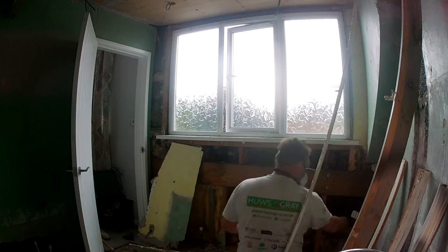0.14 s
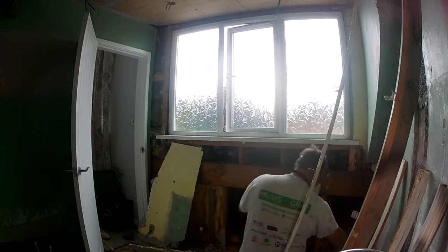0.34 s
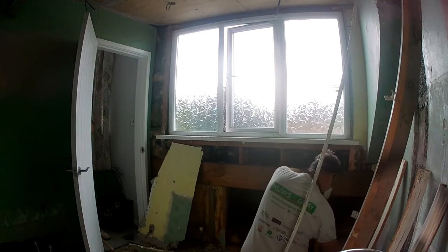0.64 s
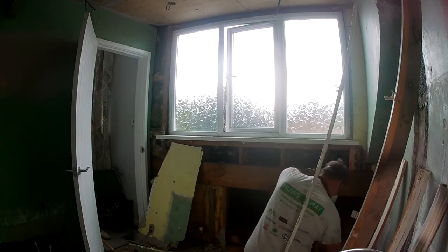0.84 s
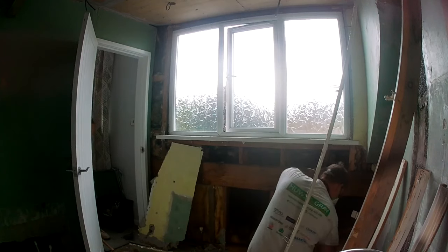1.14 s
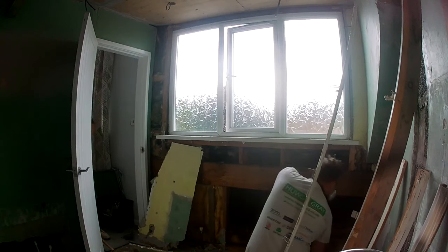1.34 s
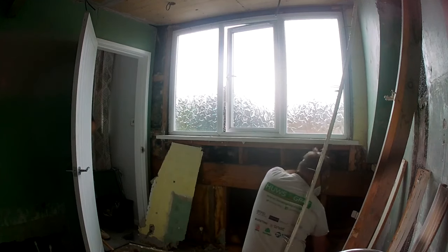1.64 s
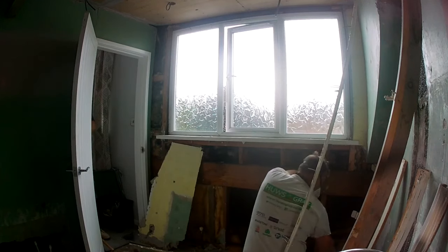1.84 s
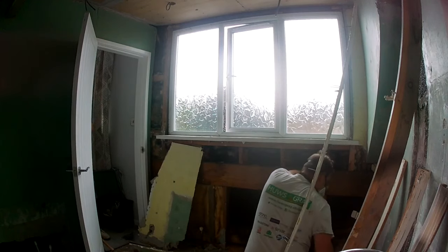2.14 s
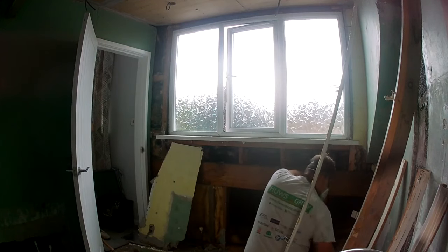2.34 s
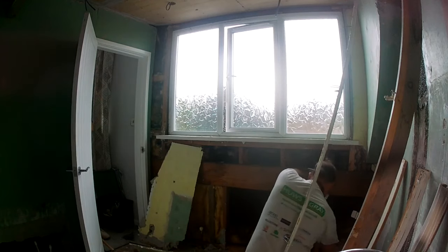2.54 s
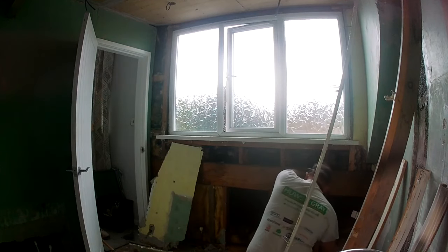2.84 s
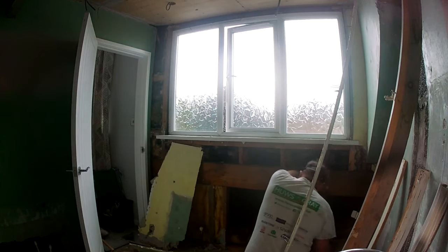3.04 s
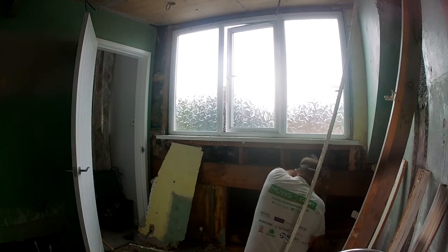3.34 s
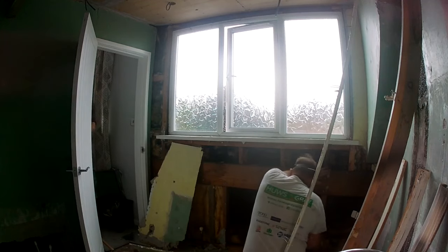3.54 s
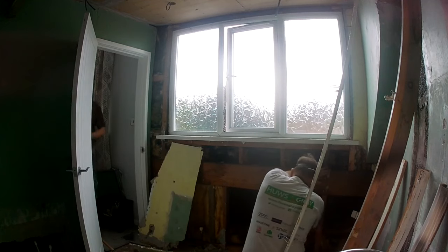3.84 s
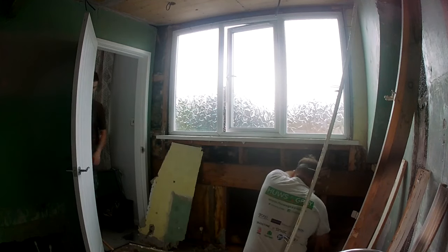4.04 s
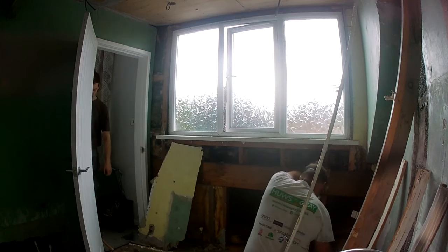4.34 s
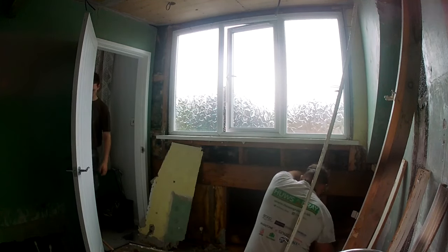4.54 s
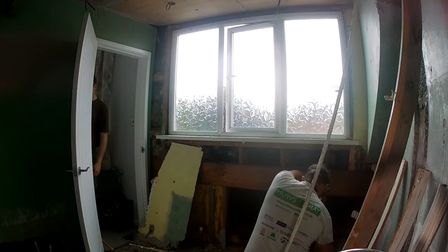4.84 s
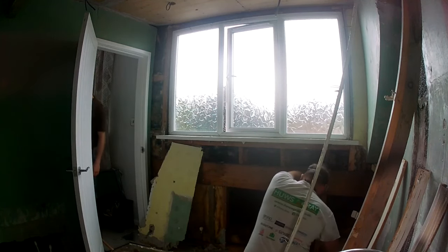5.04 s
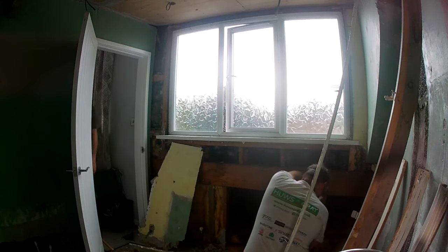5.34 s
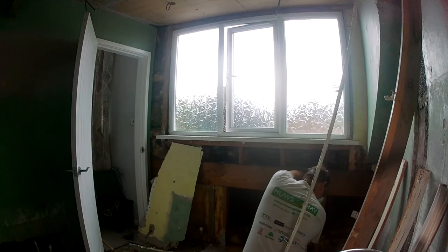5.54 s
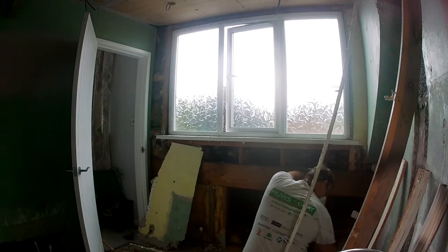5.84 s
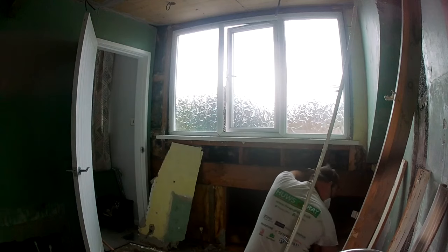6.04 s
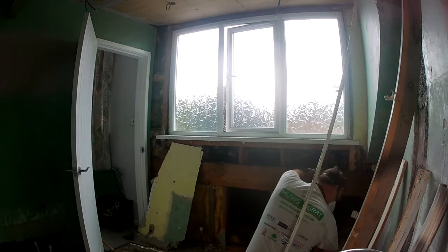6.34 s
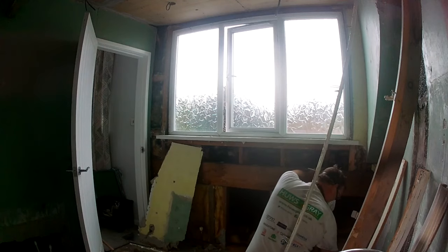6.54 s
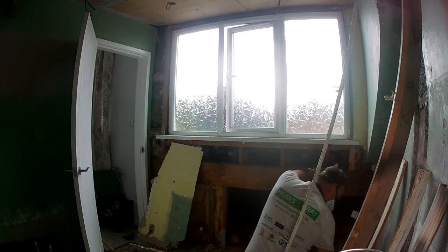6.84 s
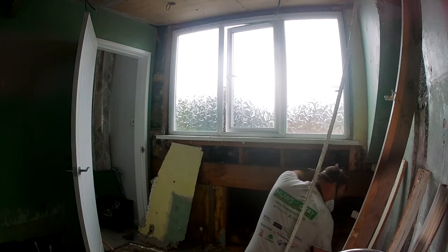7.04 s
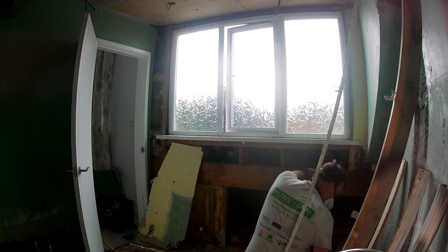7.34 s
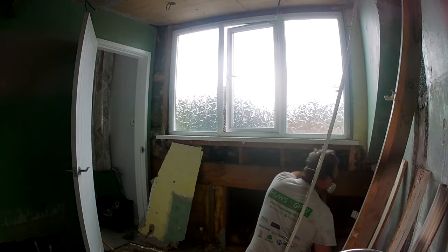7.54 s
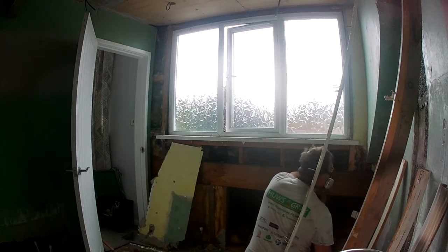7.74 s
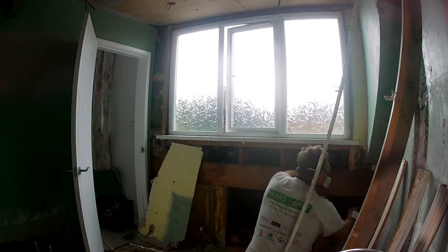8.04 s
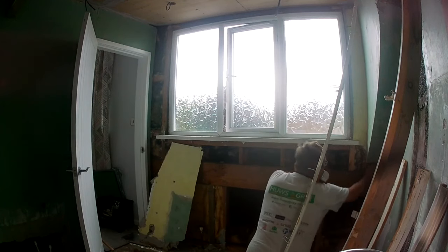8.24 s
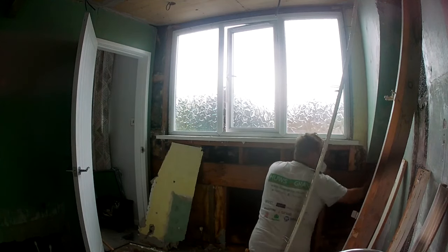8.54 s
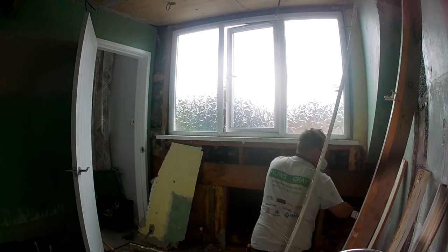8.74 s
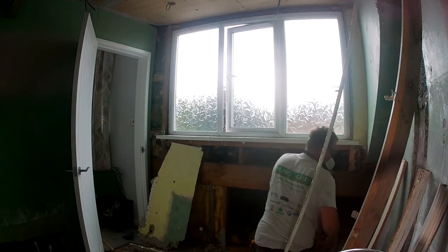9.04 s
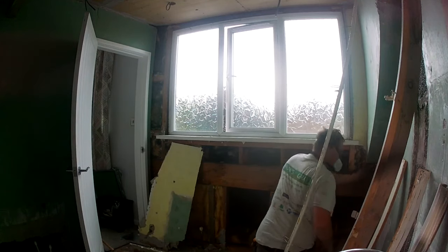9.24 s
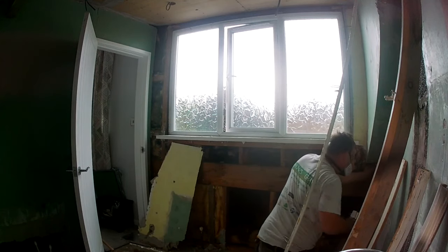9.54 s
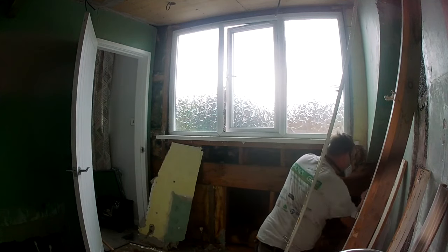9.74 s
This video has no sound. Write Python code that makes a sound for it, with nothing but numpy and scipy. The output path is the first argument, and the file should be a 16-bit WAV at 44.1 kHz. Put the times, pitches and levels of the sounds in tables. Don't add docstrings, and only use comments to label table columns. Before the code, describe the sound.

In a bare room being renovated, old boards are pried from a wall and handled, heard by a small microphone across the room. At 0-0.3 s a strong drag and hollow clattering knocks with low thumps, then light taps fading by 0.6 s. A weak tap at 1.0 and bumps at 1.25-1.5 lead to a heavy thud at 1.7 with rattling rebounds until 1.9. Quiet scuffs, moderate bumps at 2.6 and 3.2. At 3.5-3.8 a loud scrape and rapid cluster of deep blows. Lull, then knocks and short pulls at 4.3-5.0. The loudest double crash, woody and splintering, hits at 5.7. Faint shuffling follows, with a scrape and small knocks at 7.05-7.3. Sparse soft bumps until 8.6, then sharp cracks, a scrape and clatter at 8.9-9.2, lighter knocks at 9.4-9.7. Short hard reverberation, muffled treble, faint constant rumble.

```python
import sys
import numpy as np
from scipy import signal
from scipy.fft import rfft, irfft
from scipy.io import wavfile
from scipy.ndimage import uniform_filter1d

SR = 44100
rng = np.random.default_rng(int(sys.argv[2]) if len(sys.argv) > 2 else 0)


def ratio_of_db(decibels):
    return 10 ** (np.asarray(decibels, float) / 20)


def waveform_to_disk(signal):
    frames = np.transpose(np.atleast_2d(signal))
    scaled = np.clip(frames, -1, 1) * 32767
    samples = np.round(scaled).astype(np.int16)
    wavfile.write(sys.argv[1], SR, samples)


N = 436590

# (frequency [Hz], level [dB], decay time T60 [s])
FLOOR_MODES = [(59.3, -11, 0.1), (79.2, 6, 0.47), (97, -9, 0.86), (108, -17.5, 0.16)]
FRAMING_MODES = [(159.1, 4, 0.39), (188, -4, 0.35), (228, -3.5, 0.14), (281.4, 5, 0.2), (317.4, 2.5, 0.21)]
BOARD_MODES = [(388, -3.5, 0.048), (458, 0, 0.039), (590, 13.5, 0.03), (705.5, 2.5, 0.12), (831, 12, 0.045),
               (960, 13, 0.031), (1091, 12, 0.034), (1281, 15.5, 0.02), (1514, 14.5, 0.028),
               (1800, -21, 0.016)]
# (frequency [Hz], decay time T60 [s])
ROOM_T60 = [(60, 0.092), (250, 0.32), (1000, 0.37), (4000, 0.31), (12000, 0.29)]
# (frequency [Hz], density [dB per Hz])
HUM_SPECTRUM = [(12, -47), (20, 15.5), (58, -5.5), (416, -16.5), (581, -11.5), (811, -15.5), (1540, -32),
                (1980, -29.5), (3170, -37.5), (3750, -42), (6540, -45), (15500, -57)]
# (frequency [Hz], limit over the local band [dB])
THINNING = [(2000, -14), (3000, -7), (4300, -3), (4700, 2), (6800, 3.5), (16000, 4.5)]

# (time [s], held [s], board level [dB], framing rel. to board [dB])
FLOOR_DRAGS = [
    (0.0, 0.18, -42, 1),
    (1.3, 0.26, -69.5, 12),
    (1.78, 0.091, -49, 5.5),
    (3.76, 0.045, -54.5, 13),
    (4.47, 0.15, -50, 3),
    (4.84, 0.18, -69.5, 18.5),
    (5.0, 0.02, -50, -3),
    (5.82, 0.082, -49.5, 8),
    (5.98, 0.05, -51.5, -19),
    (8.52, 0.097, -62, 0),
]
# (time [s], held [s], board level [dB], framing rel. to board [dB])
WALL_DRAGS = [(0.27, 0.11, -49.5, -42), (.45, .08, -69, -6), (2.08, 0.15, -61, -19),
              (2.72, 0.16, -57.5, -5), (3.15, 0.24, -72, -6.5), (3.56, 0.16, -40, 2.5),
              (4.31, 0.084, -55, -24), (5.19, 0.23, -65, -24.5), (6.15, 0.4, -67, -40),
              (6.58, 0.043, -59, -14), (6.88, 0.071, -71.5, -16), (7.11, 0.17, -44, -2.5),
              (7.78, 0.014, -78, 2), (7.96, 0.018, -73.5, 1), (8.36, 0.14, -68.5, -1),
              (8.9, 0.065, -52, -6.5), (9.05, 0.11, -39, -25), (9.25, 0.16, -58.5, -4),
              (9.46, 0.039, -50.5, -36)]
# (time [s], board level [dB])
SHUFFLE = [(0, -64.5), (.8, -68.5), (1.5, -63), (2.4, -80), (3.1, -68), (4.1, -78.5), (5.5, -65.5),
           (6.8, -65), (7.8, -72.5), (8.7, -65.5), (9.65, -69), (9.9, -97.5)]

# (time [s], framing level [dB], framing pitch [Hz], floor level [dB])
DEEP_THUDS = [(0.012, -30.5, 288, -32), (0.086, -22.5, 217, -24), (1.698, -13.5, 180, -27),
              (1.908, -36, 237, -55), (2.779, -40, 314, -55), (3.172, -44, 312, -59),
              (3.378, -71, 139, -47), (3.544, -13, 180, -16), (3.639, -13.5, 156, -42),
              (3.664, -16.5, 305.4, -21), (3.721, -14.5, 166, -31), (3.838, -24, 163, -30),
              (4.059, -65, 137, -43), (4.11, -67, 140, -48), (4.529, -31.5, 228, -30),
              (4.599, -29, 249, -33), (4.901, -55, 209, -44), (4.99, -21, 289.4, -32.5),
              (5.668, -19.5, 156, -22.5), (5.699, -9, 261, -19), (5.747, -13, 169, -30),
              (5.987, -27, 157, -33.5), (6.443, -43.5, 176, -40), (8.348, -48.5, 332, -58),
              (8.539, -59, 150, -44.5), (9.473, -50, 356, -66)]
# (time [s], framing level [dB], framing pitch [Hz], floor level [dB])
TIGHT_THUDS = [(0.245, -31.5, 167, -48), (1.243, -41, 310, -41), (1.336, -43, 356, -50),
               (1.487, -34.5, 161, -46.5), (1.551, -36, 168, -52), (1.645, -23.5, 173, -30),
               (1.681, -10.5, 208, -17.5), (1.849, -24.5, 160, -39), (2.612, -31, 173.4, -31.5),
               (2.65, -28, 142, -34.5), (3.529, -15.5, 267, -23), (3.585, -14, 163, -38),
               (4.462, -36.5, 330, -37), (4.855, -34, 248, -51), (4.97, -31, 186, -55),
               (5.017, -31.5, 380, -29.5), (7.048, -37, 197, -61), (7.203, -24.5, 173, -68),
               (7.283, -27, 180, -62), (8.884, -39, 185.2, -62), (9.048, -34, 236, -61),
               (9.109, -37, 373, -38)]

# (time [s], peak [dB], board pitch [Hz], crack rel. [dB])
FIRM_KNOCKS = [(0.015, -26.5, 618, -21.5), (0.087, -19, 1036, -34), (0.102, -22.5, 817, -23),
               (0.149, -30.5, 967, -17), (0.999, -53.5, 816, -13), (1.249, -40, 435, -35),
               (1.379, -46, 760, -17.5), (1.685, -23, 367, -20), (1.699, -26, 620, -24),
               (2.611, -42.5, 580, -32), (3.173, -43, 597, -14.5), (3.64, -22, 543, -17),
               (4.992, -28.5, 455, -22.5), (5.749, -17, 950, -19.5), (5.951, -39.5, 410, -10),
               (6.588, -54.5, 700, -14), (7.065, -48, 696, -15), (7.165, -34, 940, -22),
               (8.202, -58, 897, -10), (8.349, -50.5, 550, -12.5), (9.107, -26.5, 647, -7),
               (9.159, -25.5, 707, -26), (9.254, -50, 626, -20), (9.399, -44, 570, -16),
               (9.476, -30.5, 664, -18)]
# (time [s], peak [dB], board pitch [Hz], crack rel. [dB])
SHARP_KNOCKS = [(0.267, -35.5, 980, -19), (0.359, -49, 865, -15), (0.461, -44.5, 775, -15),
                (0.61, -47, 850, -8), (2.739, -54, 985, -17), (2.838, -54.5, 810, -10),
                (3.14, -46, 540, -10.5), (3.414, -54.5, 1020, -5), (3.525, -28, 1400, -6.5),
                (4.296, -51.5, 980, -28), (4.639, -54, 830, -2), (5.312, -57.5, 870, -10),
                (5.713, -18, 817, -24.5), (8.441, -51, 835, -14), (8.88, -34.5, 677, -11.5),
                (8.949, -42.5, 840, 0.5), (8.991, -36, 706, -3), (9.299, -44, 555, -16),
                (9.557, -61, 693, -35.5), (9.638, -50.5, 870, -13), (9.705, -59, 1000, 4)]
# (time [s], peak [dB], board
# pitch [Hz], crack rel. [dB])
DULL_KNOCKS = [(1.636, -40.5, 590, -20), (1.879, -38, 460, -22), (2.071, -51, 937, -25),
               (3.544, -17, 425, -18), (3.579, -21.5, 857, -18), (3.663, -26, 458, -24),
               (3.837, -34, 388, -44), (4.46, -42.5, 538, -28), (4.546, -34, 603, -36),
               (4.854, -45.5, 438, -41), (5.449, -51.5, 500, -21), (5.664, -22, 423, -22),
               (5.698, -7.5, 886, -19), (2.203, -42, 590, -27), (7.765, -50, 560, -30),
               (7.948, -44.5, 614, -41), (8.609, -34, 570, -40), (9.044, -26, 614, -39)]

# (time [s], peak [dB], pitch [Hz], decay time
# T60 [s])
REBOUNDS_AND_TAPS = [(1.686, -24, 1456, 0.056), (1.697, -28, 874, .08), (1.71, -29.5, 610, .08),
                     (1.745, -34, 1504, .05), (1.8, -31.5, 332, .08), (1.843, -37, 595, 0.062),
                     (1.865, -32, 302, 0.06), (1.88, -31, 595, 0.047), (1.9, -33.5, 588, 0.043),
                     (1.9, -32, 301, 0.056), (1.923, -40, 533, 0.065), (2.615, -39, 327, 0.067),
                     (2.63, -37, 135, 0.089), (2.672, -39, 328, .06), (2.678, -46, 950, 0.043),
                     (2.735, -50, 960, .05), (2.78, -50, 930, .05), (2.831, -44, 310, 0.058), (2.84, -50, 1250, .04),
                     (2.858, -52, 328, 0.054), (3.171, -38, 600, 0.033), (3.174, -50, 1050, .03),
                     (3.589, -25, 875, 0.037), (3.605, -21, 330, 0.056), (4.5, -40, 150, 0.085),
                     (4.52, -39, 850, 0.046), (4.57, -34.5, 170, 0.097), (4.575, -44, 1343, .05),
                     (4.632, -38.5, 260, 0.067), (4.997, -36, 1350, 0.037), (5.0, -42, 846, .04),
                     (5.018, -30.5, 331, 0.075), (5.681, -26, 689, 0.049), (5.712, -8.5, 900, 0.046),
                     (5.728, -16.5, 500, 0.053), (5.926, -37, 902, .05), (8.993, -37, 1500, .05),
                     (9.06, -24.5, 800, 0.065), (9.074, -37, 850, .04), (9.132, -29, 986, 0.058),
                     (9.141, -27, 1610, 0.046), (9.158, -26, 610, .1), (9.254, -36.5, 610, 0.056),
                     (9.3, -42, 1000, .05), (9.49, -29.5, 700, 0.063), (9.555, -38, 670, 0.062),
                     (9.642, -40, 810, 0.054), (9.71, -45.5, 1103, 0.083),
                     (.017, -32, 1480, 0.052), (.095, -19, 1006, 0.045), (.105, -22.5, 560, 0.058),
        (.178, -32, 970, 0.044), (.225, -34, 1100, 0.047), (.25, -33.5, 164, 0.061),
        (.268, -27.5, 1432, .05), (.3, -37, 945, 0.084), (.499, -40, 1570, 0.046), (.563, -48, 1380, .04),
        (1.0, -53, 90, 0.074), (1.254, -37, 69, 0.27), (1.262, -43, 1000, .05), (1.338, -45, 344, 0.088),
        (1.42, -49, 760, .05), (1.5, -42.5, 170, .1), (1.525, -44, 602, 0.081), (1.712, -22, 260, .08),
        (3.545, -21.5, 95, 0.11), (3.662, -25, 1100, .04), (3.69, -26, 996, 0.065), (4.075, -44, 62, 0.13),
        (4.3, -53, 543, 0.12), (4.39, -53, 517, .1), (4.47, -41, 318, 0.11), (4.991, -32, 165, .12),
        (5.02, -41, 587, 0.068), (5.74, -21.5, 418, .06), (6.289, -60, 745, 0.036), (6.393, -61, 810, .04),
        (6.447, -49, 810, .05), (6.917, -57, 829, .05), (7.1, -39, 1490, .1), (7.142, -34, 917, .06),
        (7.18, -32, 1510, 0.072), (7.264, -37.5, 1490, 0.099), (7.589, -58, 715, 0.037),
        (5.18, -46, 820, .05), (7.885, -59, 589, 0.043), (8.0, -51, 164, .12), (8.027, -55, 560, 0.056),
        (8.19, -51, 80, 0.11), (8.47, -55, 2500, .05), (8.565, -53, 842, .04), (8.7, -52, 290, 0.19),
        (9.12, -38, 80, 0.25), (9.112, -28, 1050, 0.058), (9.41, -44, 580, 0.054), (9.46, -36, 685, 0.049),
        (9.66, -46.5, 1003, 0.068)]

# (time [s], length [s], pitch [Hz], width [Hz], level [dB])
SPLINTERS = [(.085, 0.053, 2190, 600, -47), (1.683, 0.1, 2600, 500, -48), (1.684, .07, 3750, 900, -53),
             (1.86, 0.087, 2200, 1600, -57), (2.19, 0.056, 950, 700, -61), (2.44, 0.18, 2400, 260, -76),
             (2.72, 0.047, 1450, 500, -59), (3.171, 0.056, 2400, 3600, -57), (3.645, .055, 4050, 900, -35),
             (4.46, .25, 1340, 700, -55.5), (4.63, 0.073, 2700, 1600, -59), (5.19, .09, 1350, 800, -54),
             (5.672, .03, 3820, 500, -46.5), (5.7, 0.12, 1050, 900, -28), (5.698, .08, 4700, 2800, -38),
             (5.95, 0.034, 4100, 1200, -59), (4.905, .045, 5700, 3000, -59), (6.7, 0.14, 3000, 2500, -67),
             (6.91, 0.11, 3000, 2500, -65.5), (7.15, .1, 4800, 2400, -54), (7.765, .05, 620, 600, -60),
             (5.432, .065, 5400, 2600, -61), (8.95, 0.06, 2000, 600, -54), (9.05, .06, 2600, 500, -56),
             (9.108, 0.13, 2700, 1200, -49), (9.109, 0.053, 5000, 2200, -48), (9.11, .1, 1090, 500, -38),
             (9.293, 0.046, 2700, 2400, -56), (9.398, 0.057, 3280, 1400, -55),
             (9.477, .05, 3200, 2300, -53), (9.56, 0.096, 1400, 1200, -57), (9.635, .09, 3100, 1500, -61),
             (9.71, .12, 2640, 770, -63), (9.711, 0.11, 6900, 2400, -63), (6.19, 0.19, 4200, 3600, -60)]
# (time [s], length [s], pitch [Hz], width [Hz], level [dB])
RUBS = [(0.262, 0.072, 1500, 800, -43.5), (0.456, 0.068, 1480, 740, -48), (3.532, 0.19, 840, 1070, -33.5),
        (4.292, 0.19, 3600, 6600, -54.5), (5.172, 0.13, 3300, 4200, -56), (7.1, 0.074, 4200, 2700, -65),
        (6.573, 0.095, 3400, 4800, -55.5), (8.609, 0.098, 1850, 121, -59.5), (9.492, 0.043, 1930, 360, -45),
        (9.703, 0.095, 4400, 1300, -51.5), (2.08, 0.24, 610, 500, -57.5), (6.03, .08, 4200, 3900, -52),
        (9.476, 0.06, 700, 160, -39.5), (7.27, .1, 347, 150, -46.5), (7.065, .3, 710, 1230, -45),
        (1.7, 0.15, 370, 400, -42), (8.2, 0.071, 790, 1070, -60), (4.6, 0.081, 1100, 1200, -54),
        (.99, 0.12, 790, 990, -60), (2.612, .09, 440, 560, -48.5), (3.52, 0.17, 5200, 3200, -40.5)]

HUM_DB = -59
GRIP_DB_PER_S, LET_GO_DB_PER_S = 347.5, 116.5
FLOOR_SHARE_DB, WALL_SHARE_DB = 0, -28.5
GRIT_SHARE_DB = -8
SHUFFLE_FRAMING_DB, SHUFFLE_FLOOR_DB = -6, -5.5
DEEP_FLOOR_HZ, TIGHT_FLOOR_HZ, FLOOR_SCATTER = 83.5, 99, 0.058
DULL_UPPER_DB, FIRM_UPPER_DB, SHARP_UPPER_DB = -13.5, -6, 1
DULL_UPPER_HZ, FIRM_UPPER_HZ, SHARP_UPPER_HZ, UPPER_SCATTER = 1240, 1267, 1400, 0.12
REBOUND_PAIR, REBOUND_RISE_S = 1.07, 0.0024
KNOCK_WET_DB, THUD_WET_DB, DRAG_WET_DB = -2, 0, -12


def rms_one(x):
    return x / np.sqrt(np.mean(x ** 2) + 1e-20)


def at_hz(points, hz):
    table_hz, value = np.array(points).T
    return np.interp(np.log(hz), np.log(table_hz), value)


def band(x, low_hz, high_hz):
    return signal.sosfilt(signal.butter(2, [low_hz, high_hz], "band", fs=SR, output="sos"), x)


def tones(hz, t60, t):
    return np.sin(2 * np.pi * np.outer(hz, t)) * ratio_of_db(-60 * t / t60)


def add(out, s, sound):
    start = int(s * SR)
    out[start:start + len(sound)] += sound[:N - start]


def hum():
    hz = np.maximum(np.fft.rfftfreq(N, 1 / SR), 1)
    lines = rfft(rng.standard_normal(N)) * ratio_of_db(at_hz(HUM_SPECTRUM, hz))
    return ratio_of_db(HUM_DB) * rms_one(irfft(lines, N))


def grains(per_s, spread_db):
    luck = rng.random(N) * SR / per_s
    at = np.flatnonzero(luck < 1)
    size_db = spread_db * np.minimum(-np.log(luck[at] + 1e-9), 4)
    out = np.zeros(N)
    out[at] = ratio_of_db(size_db) * (-1.) ** at
    return out


def ring(clicks, hz, t60):
    r, w = ratio_of_db(-60 / (t60 * SR)), 2 * np.pi * hz / SR
    return signal.lfilter([0, np.sin(w)], [1, -2 * r * np.cos(w), r * r], clicks + 1e-18)


def effort(rows, floor_db):
    t = np.arange(0, N, 64) / SR
    s, held, db, frame_db = np.transpose(rows)[:, :, None]
    fall_db = GRIP_DB_PER_S * np.maximum(s - t, 0) + LET_GO_DB_PER_S * np.maximum(t - s - held, 0)
    shape = ratio_of_db(db - fall_db)
    frame = (shape * ratio_of_db(frame_db)).sum(0)
    gains = shape.sum(0), frame, frame * ratio_of_db(floor_db)
    return np.array([np.interp(np.arange(N) / SR, t, gain) for gain in gains])


def dragging():
    shuffle_db = np.interp(np.arange(N) / SR, *np.transpose(SHUFFLE))
    idle = ratio_of_db(shuffle_db + np.array([[0], [SHUFFLE_FRAMING_DB], [SHUFFLE_FLOOR_DB]]))
    drags = effort(FLOOR_DRAGS, FLOOR_SHARE_DB) + effort(WALL_DRAGS, WALL_SHARE_DB)
    board_gain, frame_gain, floor_gain = idle + drags
    slips = grains(900, spread_db=1.5)
    grit = rms_one(band(grains(5400, spread_db=-1), 2000, 7000))
    board = sum(ratio_of_db(db) * ring(grains(250, spread_db=2.5) + 0.25 * slips, hz, 0.36 * t60)
                for hz, db, t60 in BOARD_MODES)
    frame = sum(ratio_of_db(db) * ring(grains(98, spread_db=-1.0), hz, 0.84 * t60)
                for hz, db, t60 in FRAMING_MODES)
    floor = sum(ratio_of_db(db) * ring(grains(120, spread_db=3.0), hz, 0.88 * t60)
                for hz, db, t60 in FLOOR_MODES)
    out = (board_gain - 0.35 * idle[0]) * ratio_of_db(GRIT_SHARE_DB) * grit
    return out + board_gain * rms_one(board) + frame_gain * rms_one(frame) + floor_gain * rms_one(floor)


def thuds(rows, joist_hz):
    out, t = np.zeros(N), np.arange(12000) / SR
    pair = ratio_of_db(np.array([0, -7]))
    for s, frame_db, frame_hz, floor_db in rows:
        floor_hz = joist_hz * (1 + FLOOR_SCATTER * rng.standard_normal())
        frame = pair @ tones(frame_hz * np.array([1, 1.38]), 0.066, t)
        floor = pair @ tones(floor_hz * np.array([1, 0.74]), 0.19, t)
        boom = ratio_of_db(frame_db + 0.5) * frame + ratio_of_db(floor_db + 2.2) * floor
        add(out, s, boom * (1 - np.exp(-t / 0.003)))
    return out


def landing(t):
    touches = rng.standard_normal(len(t)) * (rng.random(len(t)) < 0.012)
    return 0.79 * touches * np.exp(-t / 0.011) + 0.71 * (t == 0)


def knocks(rows, upper_db, upper_hz):
    out, t = np.zeros(N), np.arange(3000) / SR
    mode_hz, mode_db, mode_t60 = np.transpose(BOARD_MODES)
    tilt_db = upper_db * np.clip(np.log2(mode_hz / 600), 0, 1)
    cluster = ratio_of_db(np.array([-2.0, -15.0, -3.5, -4.5]))
    crack_fade = np.exp(-t / 0.0082) + 0.34 * np.exp(-t / 0.038)
    for s, db, hz, crack_db in rows:
        tune, share, near = rng.standard_normal((3, len(BOARD_MODES)))
        spread = 1 + 0.1066 * near[:4] * [0, 1, 1, 1]
        high_hz = upper_hz * (1 + UPPER_SCATTER * np.clip(near[-1], -1, 1))
        hit = ratio_of_db(-6.5) * cluster @ tones(hz * spread, 0.04, t)
        hit += ratio_of_db(upper_db + 4.0) * cluster @ tones(high_hz * spread, 0.015, t)
        weak = ratio_of_db(mode_db + tilt_db - 17.5 + 4.4 * share)
        hit += weak @ tones(mode_hz * (1 + 0.068 * tune), 0.86 * mode_t60[:, None], t)
        hit *= 1 - np.exp(-t / 0.0022)
        snap = rng.standard_normal(len(t)) * crack_fade * (1 - np.exp(-t / 0.0015))
        add(out, s, ratio_of_db(db + crack_db + 13.0) * band(snap, 1200, 5600))
        landed = signal.fftconvolve(hit, landing(t[:900]))
        add(out, s, ratio_of_db(db + 3) * landed * np.abs(hit).max() / np.abs(landed).max())
    return out


def rebounds():
    out, t = np.zeros(N), np.arange(6000) / SR
    for s, db, hz, t60 in REBOUNDS_AND_TAPS:
        pair = ratio_of_db(np.array([0, -6])) @ tones(hz * np.array([1, REBOUND_PAIR]), t60, t)
        add(out, s, ratio_of_db(db) * pair * (1 - np.exp(-t / REBOUND_RISE_S)))
    return out


def rubs(rows):
    out = np.zeros(N)
    for s, length, hz, width_hz, db in rows:
        t = np.arange(int(length * SR)) / SR
        low_hz, high_hz = max(hz - width_hz / 2, 100), hz + width_hz / 2
        noise = band(rng.standard_normal(SR // 2), low_hz, high_hz)[-len(t):]
        add(out, s, ratio_of_db(db) * rms_one(noise) * np.sin(np.pi * np.sqrt(t / length)))
    return out


def room(x):
    t = np.arange(SR * 5 // 8) / SR
    edges = 35 * 2. ** np.arange(10)
    edges[-1] = 19000
    out = 0
    spot = (np.arange(N) / SR / 0.7 + 0.2).astype(int) % 4
    for place in range(4):
        white = rng.standard_normal((2, len(t)))
        echo = np.zeros(len(t))
        for k, (low, high) in enumerate(zip(edges, edges[1:])):
            t60 = at_hz(ROOM_T60, np.sqrt(low * high))
            echo += band(white[k % 2], low, high) * ratio_of_db(-60 * t / t60)
        echo *= 1 - np.exp(-t / 0.0034)
        out = out + signal.fftconvolve(x * (spot == place), echo / np.sqrt(np.sum(echo ** 2)))[:N]
    return out


def housing(x):
    dull = signal.sosfilt(signal.butter(2, 2200, fs=SR, output="sos"), x)
    return dull + ratio_of_db(-1.0) * band(dull, 3480, 4200)


def scene():
    hits = knocks(DULL_KNOCKS, DULL_UPPER_DB, DULL_UPPER_HZ)
    hits += knocks(FIRM_KNOCKS, FIRM_UPPER_DB, FIRM_UPPER_HZ)
    hits += knocks(SHARP_KNOCKS, SHARP_UPPER_DB, SHARP_UPPER_HZ)
    hits += rubs(RUBS) + rebounds()
    booms = thuds(DEEP_THUDS, DEEP_FLOOR_HZ) + thuds(TIGHT_THUDS, TIGHT_FLOOR_HZ)
    drag = dragging()
    echo = room(ratio_of_db(KNOCK_WET_DB) * hits + ratio_of_db(THUD_WET_DB) * booms + ratio_of_db(DRAG_WET_DB) * drag)
    return np.array([housing(hits + booms + drag + echo + rubs(SPLINTERS)) + hum()])


def thin(x):
    hz, s, lines = signal.stft(x, SR, "cosine", nperseg=2048, noverlap=1024)
    power = np.abs(lines) ** 2 + 1e-24
    local = uniform_filter1d(power, size=24, axis=0)
    busy = np.clip((10 * np.log10(power.sum(0)) + 62) / 14, 0, 1)
    patch = np.repeat(rng.standard_normal((65, len(s))), 16, axis=0)[:len(hz)]
    limit_db = at_hz(THINNING, hz + 1)[:, None] + 2.2 * patch - 7 * (1 - busy)
    keep = (power > local * ratio_of_db(2 * limit_db)) | (hz < 2000)[:, None]
    return signal.istft(lines * keep, SR, "cosine", nperseg=2048, noverlap=1024)[1][:N]


def low_pass(x):
    return signal.sosfilt(signal.butter(12, 15710, fs=SR, output="sos"), x)


def record(dry):
    level = np.sqrt(uniform_filter1d(dry[0] ** 2, size=1200) + 1e-12)
    rounded = 0.9 * np.tanh(dry[0] / 0.9)
    heard = signal.sosfilt(signal.butter(2, 44, "high", fs=SR, output="sos"), rounded)
    fizz = ratio_of_db(-38.0) * level * band(rng.standard_normal(N), 7600, 17000)
    return low_pass(np.array([thin(heard + fizz)]))


dry = scene()
out = record(dry)
waveform_to_disk(out)
```